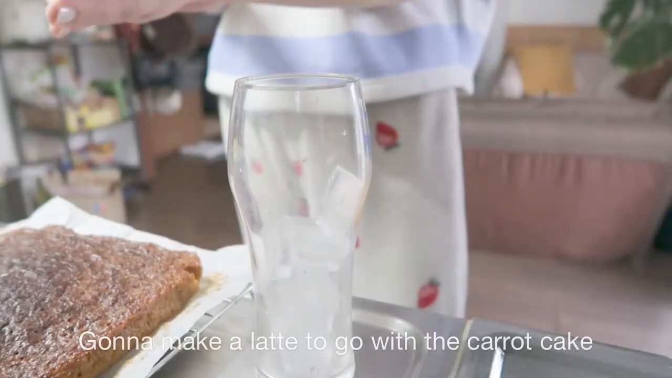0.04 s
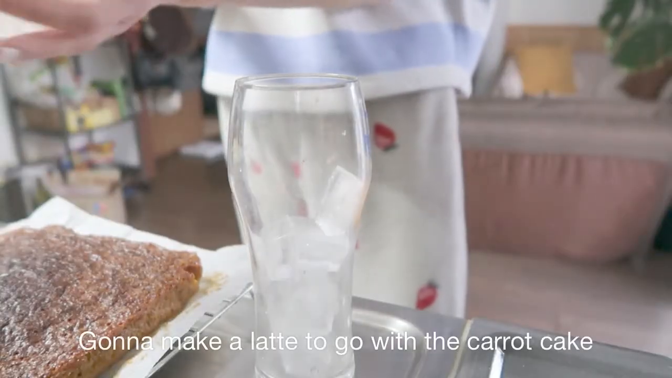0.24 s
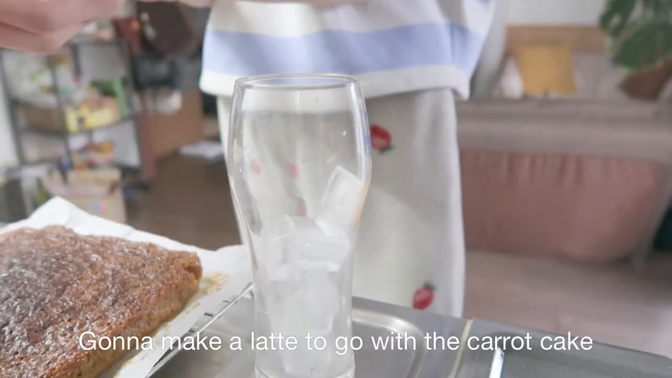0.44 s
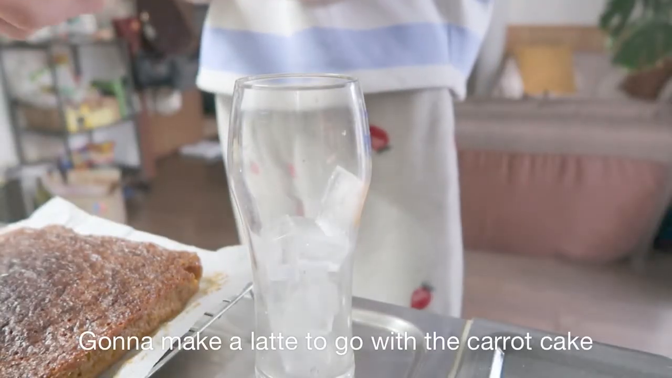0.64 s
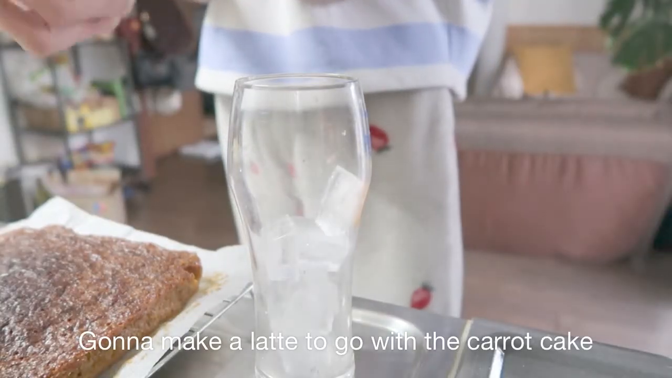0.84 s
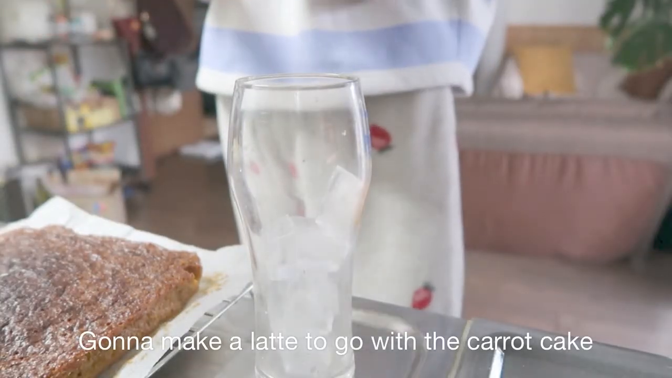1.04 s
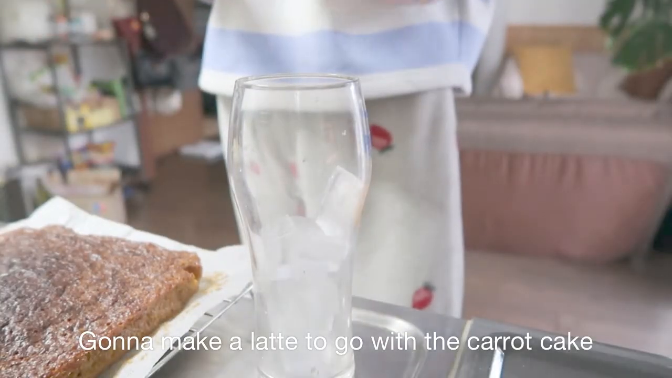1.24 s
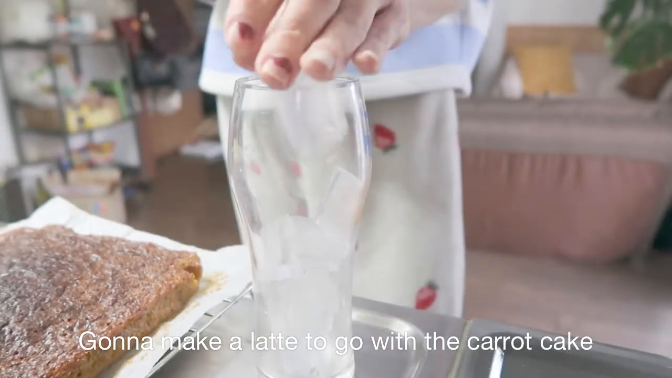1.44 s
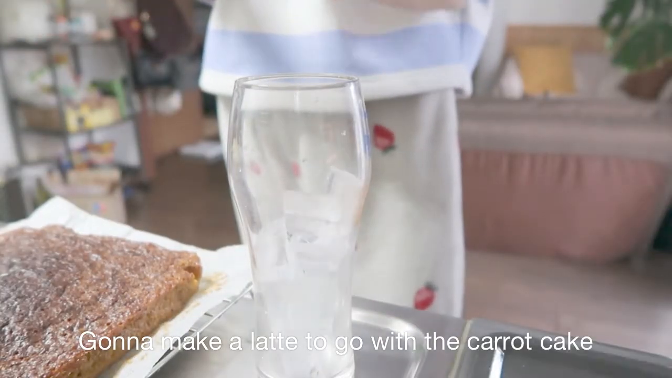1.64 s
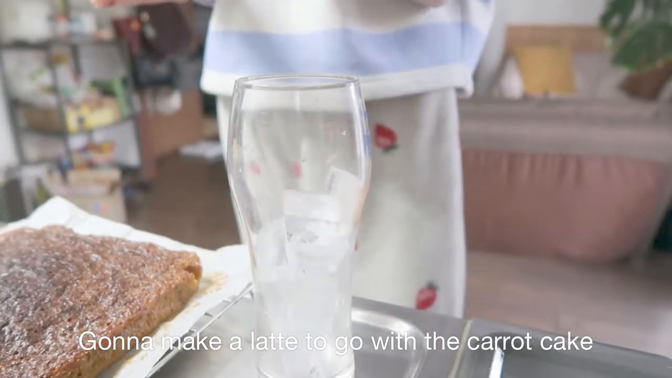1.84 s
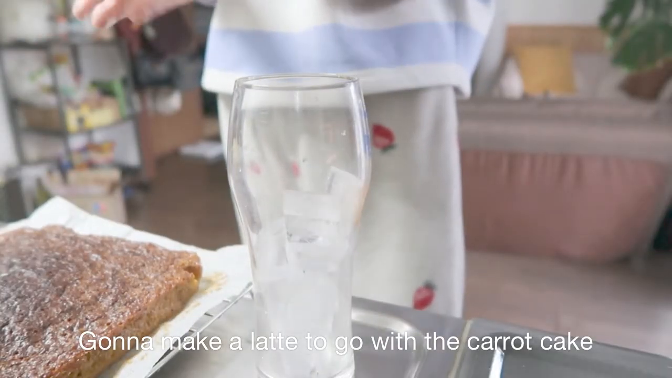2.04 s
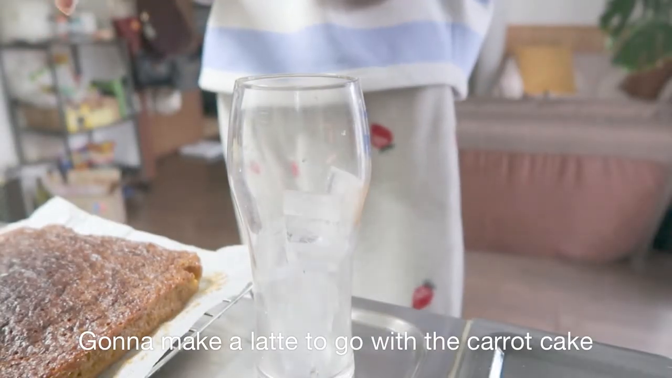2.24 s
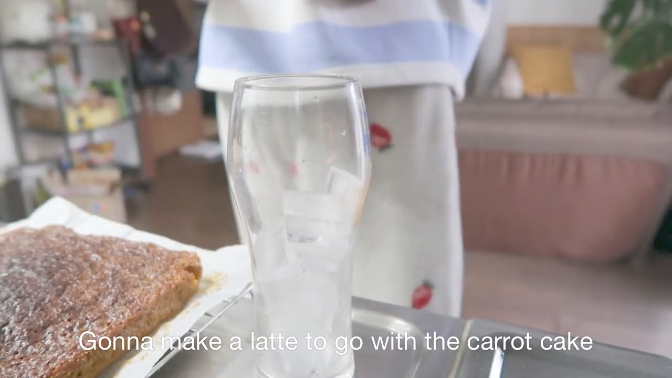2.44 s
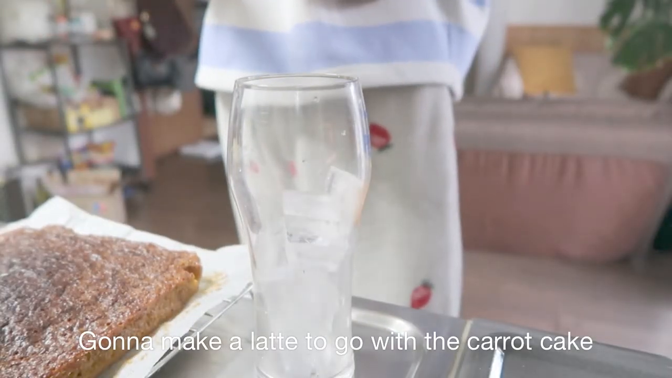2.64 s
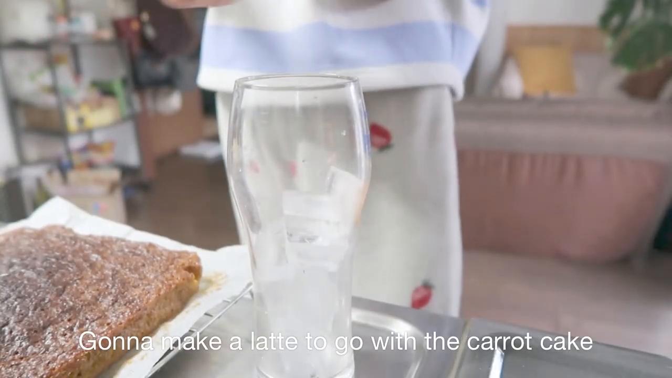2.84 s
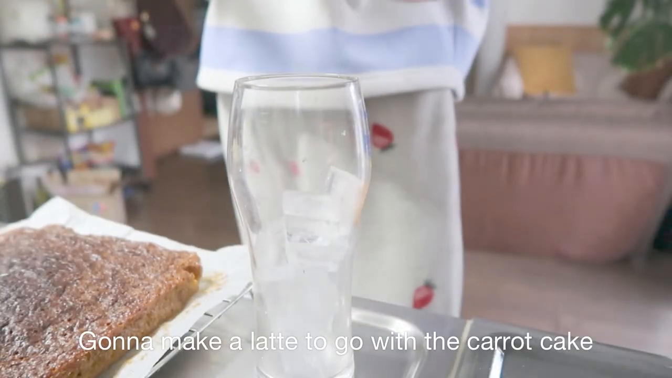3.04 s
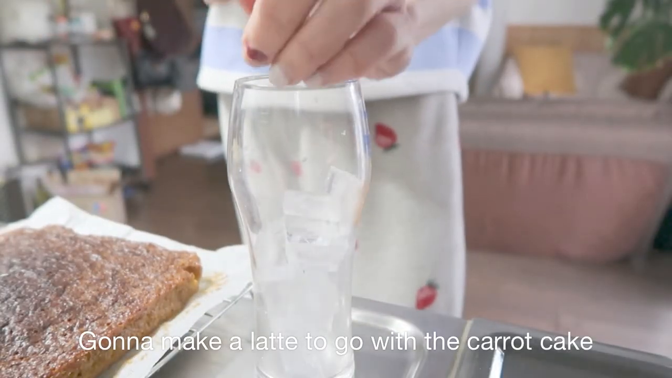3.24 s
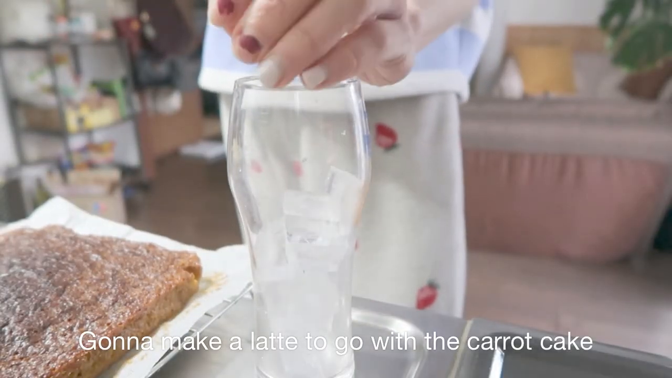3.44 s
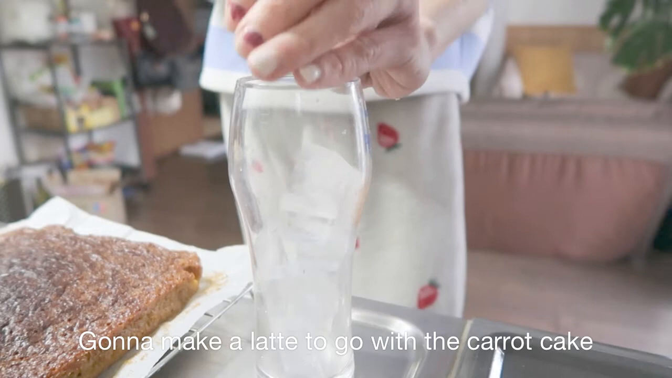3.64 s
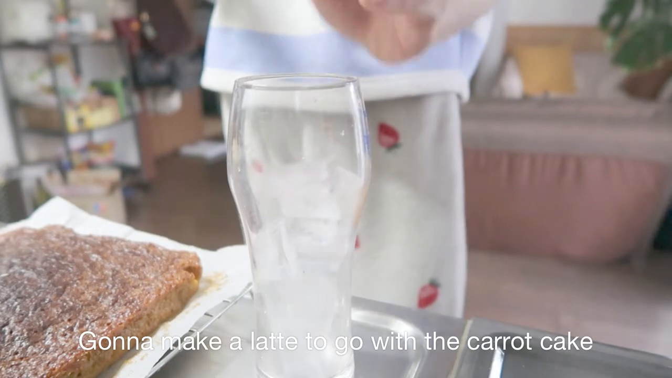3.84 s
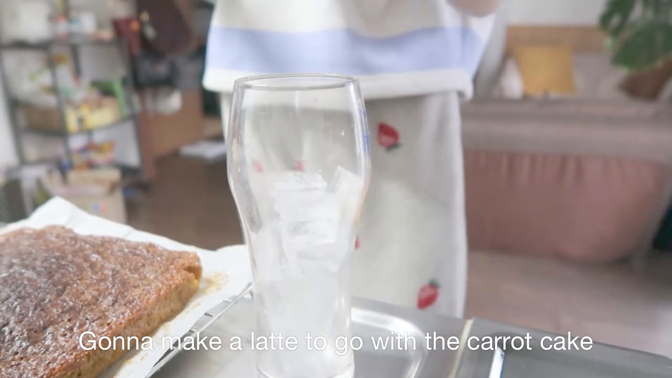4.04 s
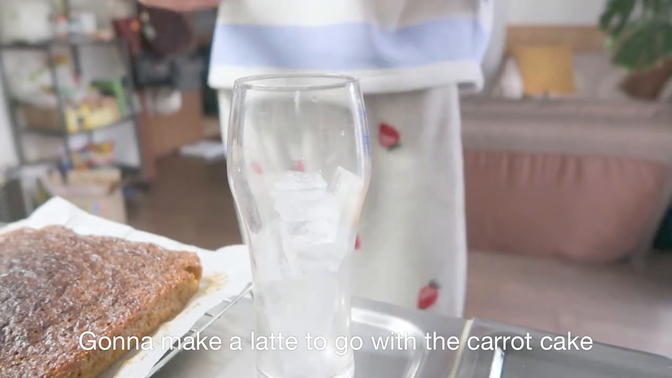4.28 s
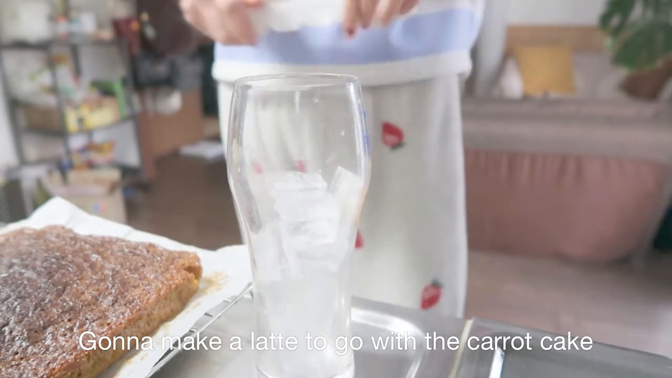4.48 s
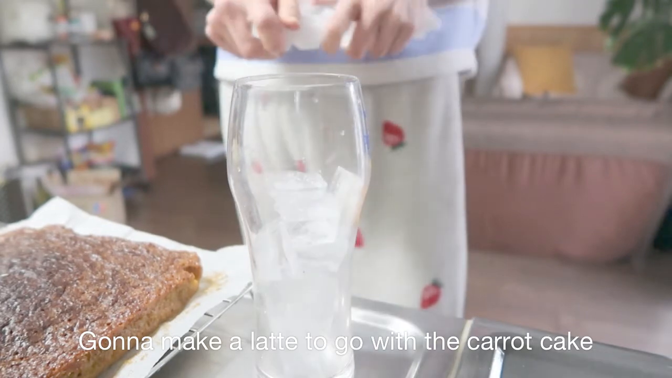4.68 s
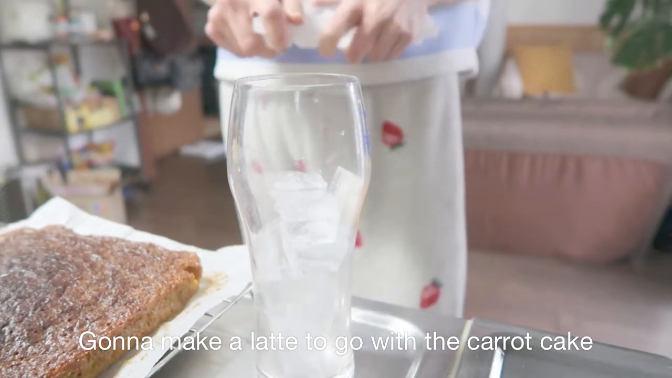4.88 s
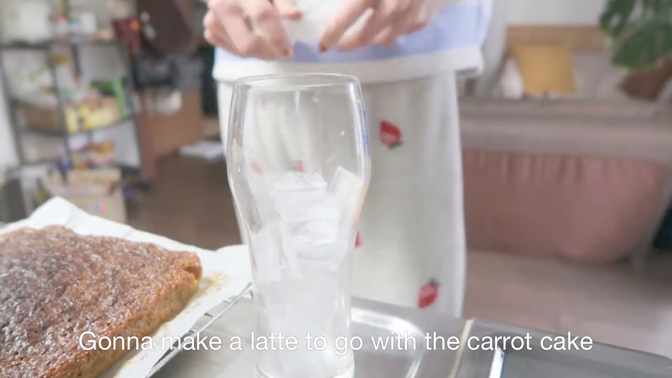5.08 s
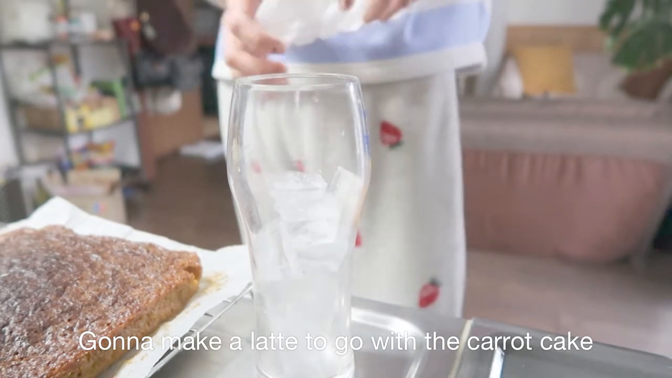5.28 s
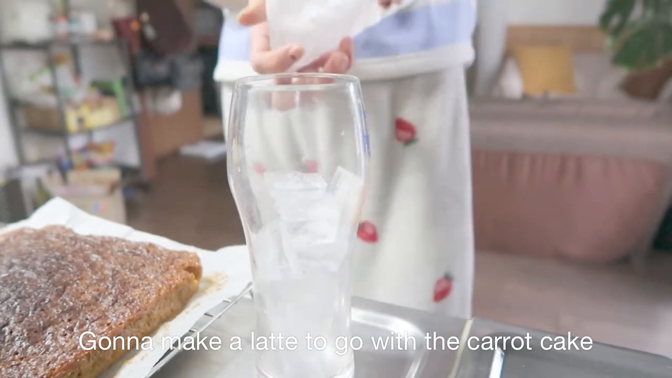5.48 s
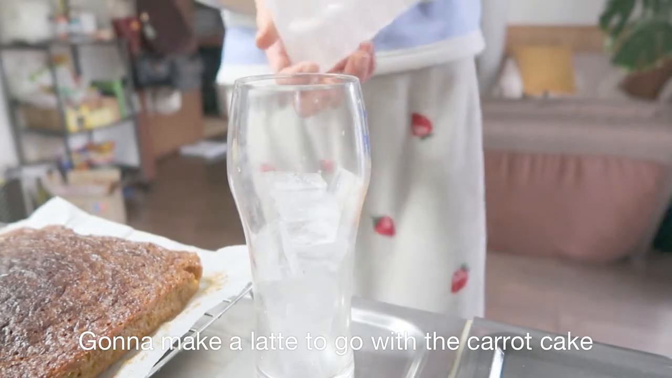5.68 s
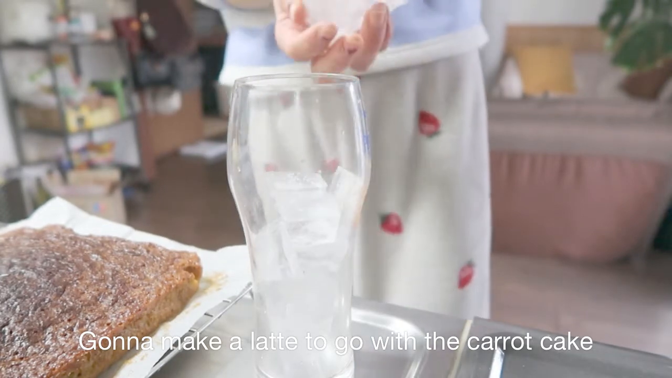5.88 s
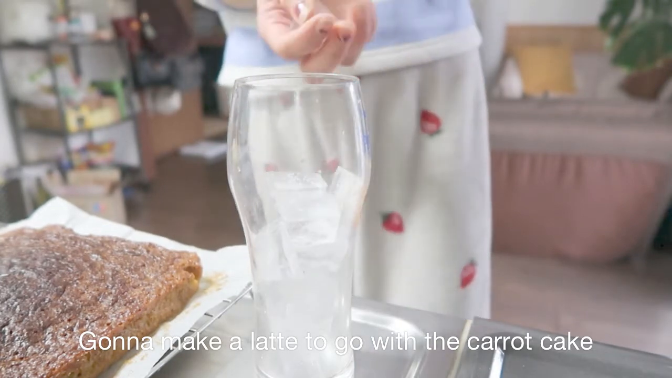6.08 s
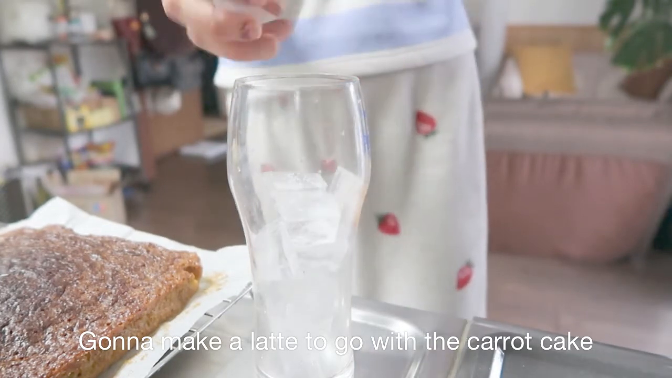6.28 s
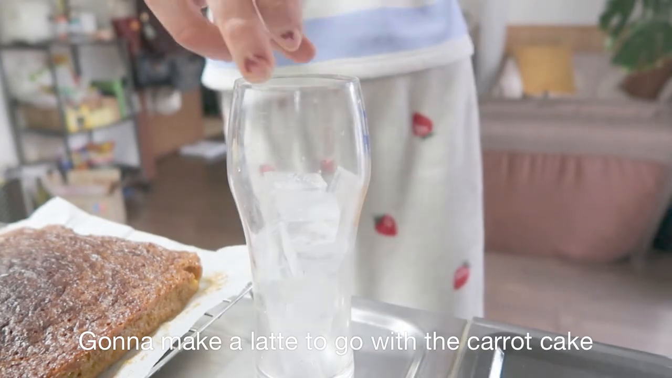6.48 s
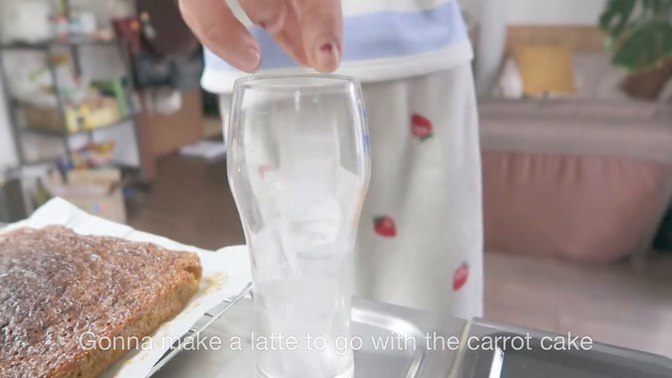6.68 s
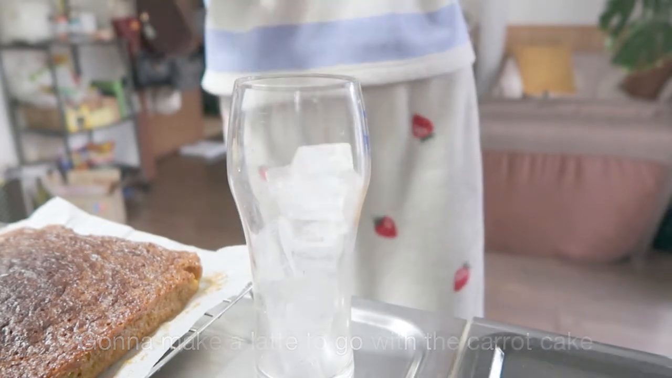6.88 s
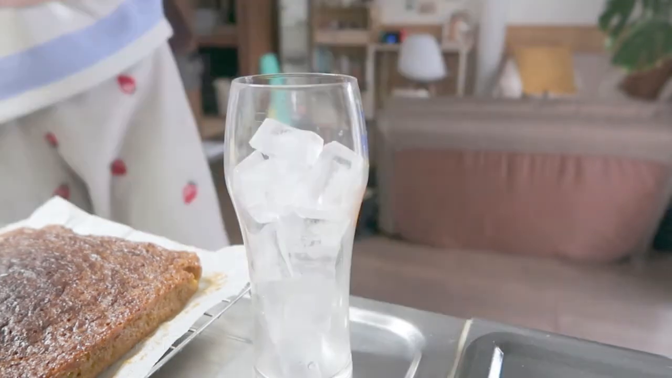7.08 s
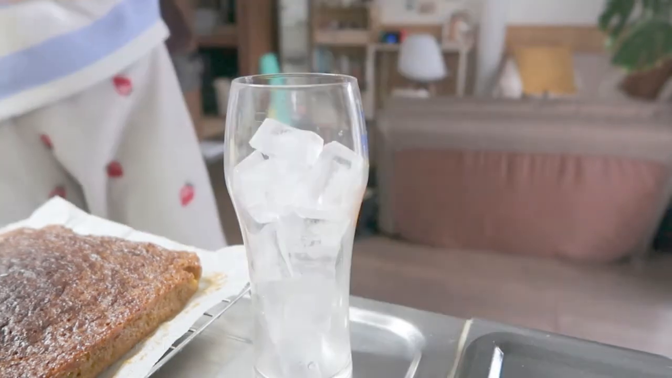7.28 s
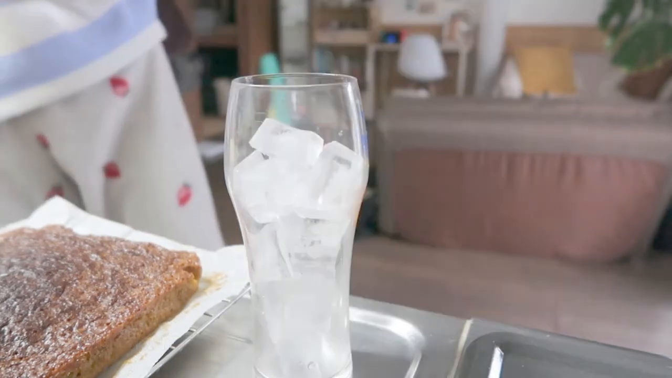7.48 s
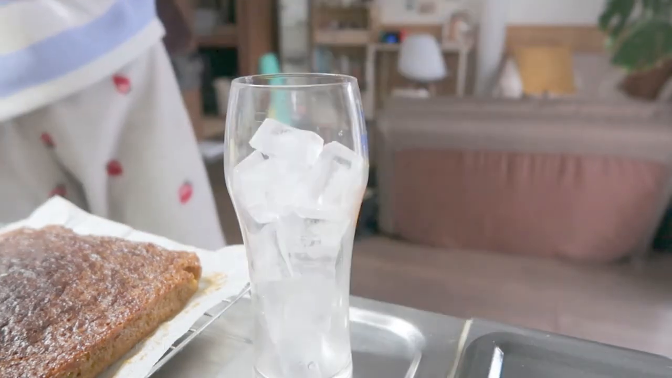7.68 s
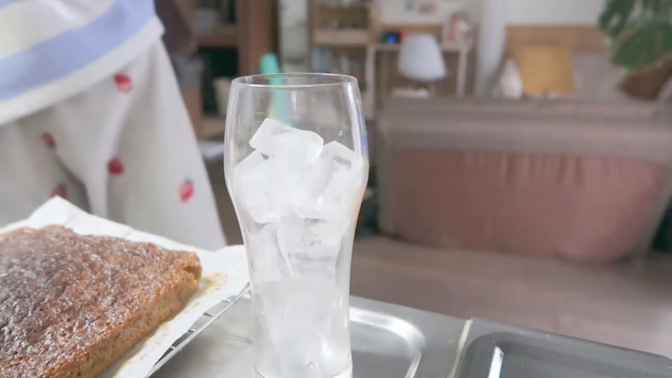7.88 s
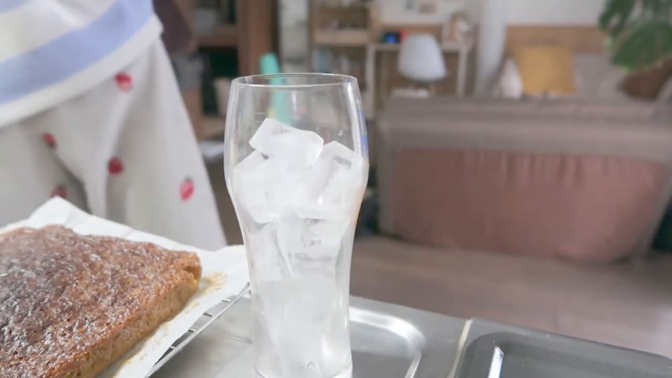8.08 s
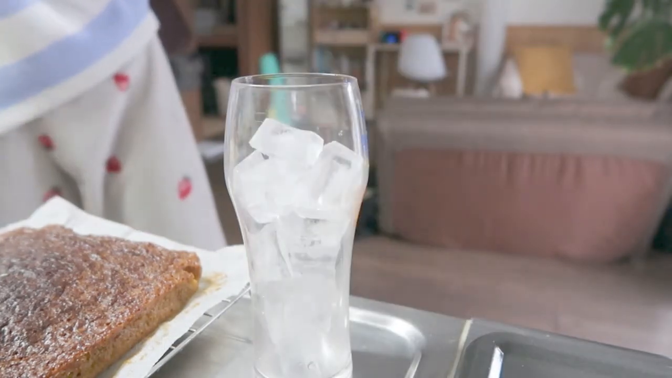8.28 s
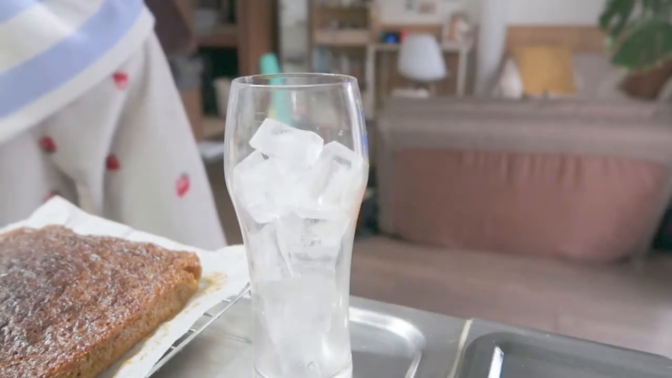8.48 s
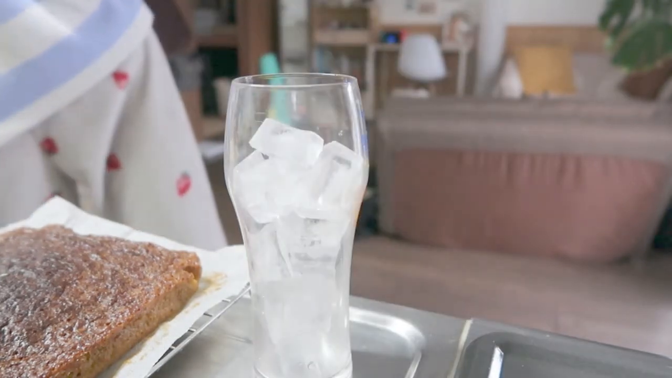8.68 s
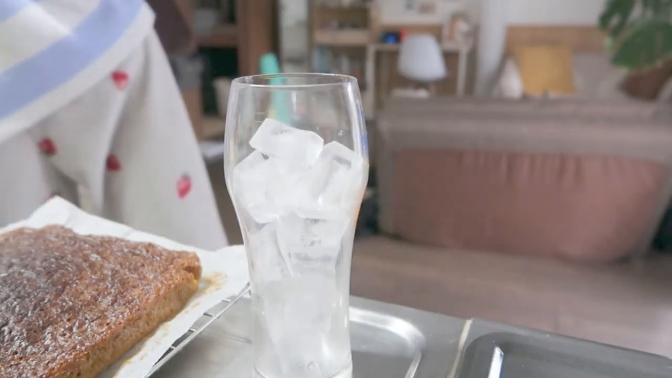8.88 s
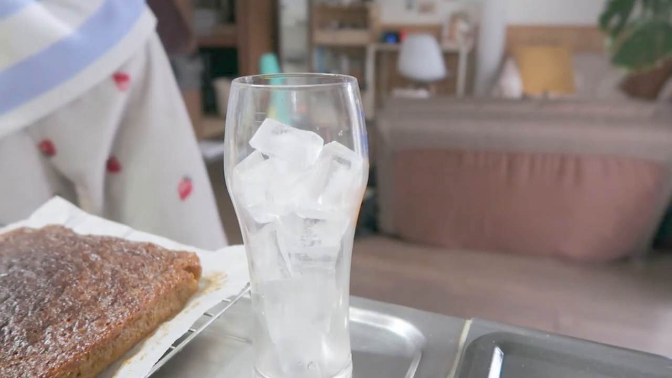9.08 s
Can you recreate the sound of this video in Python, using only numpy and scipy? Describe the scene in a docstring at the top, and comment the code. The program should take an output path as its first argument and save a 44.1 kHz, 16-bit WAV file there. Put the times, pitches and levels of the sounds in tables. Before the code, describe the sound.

Close, dry stereo sound of ice handling: brittle crackles, scraping and tiny squeaks from a plastic tray, interrupted three times by cubes hitting a glass, with glassy ring, icy clatter and a light counter thump. Between them it is nearly silent, with faint thawing ticks. Towards the end a heavy panel bangs and rattles further into the small room, then soft bumps and muffled crockery chatter.

```python
"""First a plastic ice tray cracks, rubs and squeaks as it is worked, over a soft rumble and hiss.
Three times, ice cubes drop into a tall glass on a kitchen counter: noise bursts make the clacks and thumps,
and decaying sines make the glass, the cubes and the counter ring. Cracks are noise bursts too.
Soft bumps sound further off, something heavy is knocked shut nearby, and distant dishes clink.
The room is small and quiet; loud sounds push its background down for a while."""
import sys
import numpy as np
from scipy import signal
from scipy.fft import rfft, irfft, next_fast_len
from scipy.io import wavfile
from scipy.ndimage import uniform_filter1d

SR = 44100
rng = np.random.default_rng(int(sys.argv[2]) if len(sys.argv) > 2 else 0)


def log_audio(samples):
    """Write samples as a 16-bit WAV file to the path given in sys.argv[1]."""
    # one column per channel
    frames = np.atleast_2d(samples).T
    # limit to full scale, then quantise
    limited = np.clip(frames, -1, 1)
    pcm = np.round(limited * 32767).astype(np.int16)
    wavfile.write(sys.argv[1], SR, pcm)


N = 402191
TIME = np.arange(N) / SR  # seconds since the start
AGE = TIME[:SR // 2]  # seconds since a strike

# All levels in the tables are relative; the functions set the final balance.

# background colours: (frequency [Hz], level [dB])
RUMBLE_COLOUR = [(12, -36), (20, -0.5), (97, 2), (161, -4.5), (252, -3), (325, -6), (399, -3), (515, -12.5),
                 (604, -15), (818, -13.5), (900, -15.5), (1170, -36.5), (1980, -120)]
HISS_COLOUR = [(290, -28), (500, -9.5), (1320, -4), (1550, -7), (1980, -8.5), (2460, -8.5), (3650, -12),
               (3980, -13.5), (4400, -12.5), (5470, -16.5), (12900, -30.5), (13800, -50), (16000, -59)]
# the low rumble swells: (time of peak [s], level [dB], rise [s], fall [s])
RUMBLE_SWELLS = [(3.58, -44.5, 0.22, 0.22), (6.6, -46, 0.17, 0.26), (8.62, -52, 0.7, 0.35),
                 (9.1, -51, 0.27, 0.18)]
RUMBLE_DB, HISS_DB = -53.5, -59
SWING_DB = 10.5  # a swell gains this over one rise time and loses it over one fall time
DUCK_ABOVE_DB, DUCK_RATIO, DUCK_RECOVERY_DB_PER_S = -17, 1.31, 11

# the tray cracks as it is bent: (time [s], level [dB], pitch [Hz], treble against the middle [dB])
CRACKS = [(0.0205, -26.5, 3400, -9.5), (0.0477, -20.5, 2400, -1), (0.0562, -15.5, 3450, -9.5),
          (0.0877, -6, 2930, -2), (0.2169, -7, 2770, 10.5), (0.2281, -8.5, 2800, -6),
          (0.311, -18.5, 1900, 0), (0.3776, -13.5, 1730, -2.5), (.4105, -11.5, 2120, -24),
          (0.4282, -17, 1840, -25), (0.461, -26.5, 1965, -20), (0.516, -32, 4260, 11.5),
          (0.619, -23, 3220, -6), (0.6239, -17, 2570, 1), (0.789, -34, 1430, -22), (1.064, -11.5, 3000, 9),
          (1.069, -10, 2600, 6), (2.0769, -25.5, 1400, -13), (2.1276, -29.5, 3150, 1),
          (2.179, -35, 2610, 0), (2.2934, -15.5, 3860, -21), (2.4728, -21.5, 1680, -12),
          (4.215, -28.5, 2830, -9), (4.271, -34, 3970, -2), (4.397, -22, 3130, 1.5),
          (4.465, -14.5, 2680, -29.5), (4.5424, -16, 1290, -29), (4.723, -14, 4780, -14.5),
          (4.747, 2.5, 2650, -9), (4.7505, -6.5, 1420, -21), (4.7525, -16, 710, -15),
          (5.454, -19, 1480, -3), (5.4955, -24, 2730, -1), (5.522, -26, 2800, -12.5),
          (5.559, -29, 2600, -10), (5.732, -14, 3850, -14.5), (5.7599, -17, 2180, -25),
          (5.815, -21, 3840, -20), (5.907, -18.5, 1950, -26.5), (5.973, -2, 2980, -34),
          (7.3564, -25.5, 2470, 1.5)]
# colour of a snap: (frequency [Hz], level [dB])
CRACK_COLOUR = [(150, -65), (600, -8), (1200, -5.5), (2100, 6), (3200, 4), (4500, 0), (7000, -5.5),
                (10000, -12), (13000, -36), (16000, -42)]
AFTERSNAP_S, AFTERSNAP_DB = 0.0046, -8.5  # typical delay of the second snap; its level against the crack
FORESNAP_S, FORESNAP_DB = 0.0027, -22.5  # the plastic starts to give just before it cracks
SNAP_WALL_Q, SNAP_WALL_DB = 5.05, 15  # the cracked wall's broad resonance; its level against the snap
TICKS_PER_S, TICK_OVER_RUB_DB, TICK_SPREAD_DB = 26, 5.5, 3  # small ticks while the tray is worked
TICK_HZ, TICK_TREBLE_DB = 2400, -9  # middle pitch of the small ticks; their treble

# strokes of ice and fingers on the tray:
# (time of peak [s], level [dB], rise [s], fall [s], pitch of the rubbed wall [Hz])
STROKES = [(.17, -37.5, 0.12, 0.15, 2390), (.28, -34.5, 0.093, 0.2, 1614), (.44, -59, 0.06, .09, 1880),
           (.6, -47, 0.046, 0.029, 3160), (.78, -41.5, 0.092, 0.051, 1390), (.91, -38, 0.048, 0.03, 3700),
           (1.079, -37.5, 0.048, 0.067, 4440), (2.01, -48.5, .071, 0.078, 3050),
           (2.169, -43, 0.033, 0.052, 2770), (2.32, -41, 0.071, 0.033, 3130),
           (2.54, -40.5, 0.069, 0.046, 2490), (2.858, -29, 0.061, .012, 3400),
           (4.39, -39, 0.072, 0.077, 2920), (4.57, -38, 0.049, 0.094, 1560),
           (4.664, -33, 0.065, 0.016, 3680), (4.779, -27.5, 0.034, 0.036, 1550),
           (5.05, -50, 0.058, 0.064, 1720), (5.12, -40, 0.026, 0.065, 2900),
           (5.319, -37.5, 0.053, 0.043, 2760), (5.509, -38, 0.041, 0.055, 2820),
           (5.76, -35.5, 0.056, 0.086, 2740), (6.005, -37.5, 0.063, 0.0085, 2930)]
# colour of the rubbing: (frequency [Hz], level [dB])
RUB_COLOUR = [(410, -39), (700, -21), (2160, -1), (2700, 3), (3840, -6.5), (9230, -11), (11700, -39.5),
              (14000, -18), (15400, -40), (16000, -61)]
# a cube squeaks against the tray as it comes free: (time [s], level [dB], pitch [Hz], length [s])
SQUEAKS = [(0.228, -28, 2102, 0.025), (2.858, -23, 2021, 0.0096), (4.354, -38.5, 2070, 0.0094),
           (6.009, -29.5, 2940, 0.007)]
GRAINS_PER_S = 350
WALL_Q, WALL_DB = 5.6, -10.5  # sharpness of the rubbed wall's resonance; its level against the stroke
JERK_DB, JERKS_PER_S = 3.3, 110  # spread and rate of the uneven jerks

MELT_TICKS_PER_S, MELT_DB, MELT_HZ, MELT_T60_S = 14, -53, 4400, 0.0087  # faint ticks of thawing ice

# cubes strike the glass: (time [s], clack [dB], cube pitch [Hz], thump [dB],
# ring near 1.6, 3.9, 6.2 and 7.1 kHz [dB, four columns], ring length [factor], place round the rim [rad])
DROPS = [(1.4861, 6, 3790, -23.5, -11.5, -3, -47, -36, 0.76, 0.16),
         (1.58, -8, 3340, -30.5, -20, -31, -38, -29.5, 0.8, 0.25),
         (1.5883, -12.5, 2900, -18, -22.5, -47, -31, -48, 0.77, 0.095),
         (1.6115, -15, 3550, -23.5, -25, -29.5, -37, -38, 0.82, 0),
         (1.6855, -4, 3030, -23.5, -34, -15.5, -15, -30.5, 0.84, 0),
         (3.3491, -46, 1160, -35.5, -37, -29.5, -53, -36, 0.3, 0.47),
         (3.357, -49, 1700, -34, -46, -52, -58, -42, .5, 0.17),
         (3.463, -50, 1700, -44.5, -49, -61.5, -72, -72, 0.5, 0.057),
         (3.487, -49, 4520, -53.5, -61, -54, -68, -68, 0.98, 0),
         (3.521, -55.5, 3920, -50.5, -62, -52.5, -69, -62, 0.63, 0),
         (3.6118, -22.5, 2630, -29, -27.5, -50, -57, -42, 0.51, 0.1),
         (3.648, -38.5, 1900, -35, -48, -55, -62, -62, .6, 0),
         (3.658, -34, 3700, -34.5, -50, -44, -58, -55, 1.3, 0),
         (3.6855, 0.5, 3520, -18, -23, -10, -30, -40, 0.38, 0),
         (3.6897, -2, 1720, -22, -30, -28, -38, -48, 0.39, 0.38),
         (3.6968, 0.5, 3730, -23, -31, -18, -22, -34, 0.81, 0.24),
         (3.707, -10, 2970, -35, -42, -21.5, -42, -54, 0.38, 0.11),
         (3.722, -18, 2270, -33.5, -44, -40, -33, -52.5, 0.62, 0),
         (3.7354, -16, 3100, -41.5, -48, -36, -33, -56, 0.49, 0),
         (3.747, -25, 4300, -44, -51, -30.5, -41, -49, 1.5, 0),
         (3.759, -33, 3620, -45.5, -48, -37.5, -44, -56, 0.58, 0.11),
         (3.782, -20, 1700, -27, -16.5, -48, -52, -58, 0.14, 0),
         (3.819, -20, 1700, -30.5, -50, -37, -59, -65, 0.7, 0.17),
         (3.886, -46, 3000, -36.5, -46, -42, -60, -66, 0.92, 0.25),
         (3.915, -27, 4400, -33, -50, -38, -52, -64, 0.68, 0.28),
         (3.9265, -19, 3170, -30.5, -35.5, -28.5, -44, -54, 0.61, 0.16),
         (3.941, -13.5, 2380, -29.5, -52, -43, -37, -47, 0.83, 0.23),
         (3.9688, -16, 2280, -35.5, -53, -32, -48, -62, 0.59, 0),
         (3.978, -16.5, 3130, -28, -55, -28.5, -32, -42, 0.51, 0),
         (6.463, -54, 2980, -52.5, -59, -52, -70.5, -63, 0.53, 0.15),
         (6.5597, -60, 3000, -47, -55, -42, -67, -55, 0.31, 0.049),
         (6.7787, -1, 3270, -14.5, -38, -44, -45, -46, 0.59, 0),
         (6.785, -1.5, 2115, -16, -21, -36, -11.5, -44, 0.61, 0.072),
         (6.8, -6, 3740, -46, -14.5, -10.5, -39, -34, 1.07, 1.17),
         (6.817, -27, 3100, -32, -54, -33, -25, -54, 0.58, 0.054),
         (6.854, -29, 3380, -40, -56, -50, -37, -58, 0.62, 0.36),
         (6.865, -25, 4200, -38.5, -48, -47, -51, -60, 1.1, 0)]
# the glass wall: (frequency [Hz], level [dB], 60 dB decay before the ring length factor [s])
GLASS_MODES = [(1620, -1.5, 0.31), (2150, -25, 0.19), (3040, -26, 0.201), (3150, -16, 0.1),
               (3390, -23, 0.2), (3569, -23.5, .19), (3871, -1, 0.29), (4460, -27.5, .1),
               (6260, -1, 0.1094), (6400, -9, 0.18), (6660, -8.5, 0.23), (7120, 2, 0.15), (7220, -5, 0.14),
               (7790, -13.5, 0.091), (8600, -20.5, 0.067), (9430, -12, 0.23), (9050, -17.5, 0.14),
               (10600, -17.5, 0.1), (11600, -15, 0.043), (13280, -15, .13)]
# the glass on the counter: (frequency [Hz], level [dB], 60 dB decay [s])
FOOT_MODES = [(88.7, -15, 0.48), (121, -16.5, 0.18), (192, -16.5, 0.1), (218, -13.5, 0.15),
              (384, -15, 0.15), (462.5, -16, 0.057), (621, -5.5, 0.096), (950, -11.5, 0.036),
              (1153, -6, 0.052)]
# a cube's own short ring: (ratio to its pitch, level against its clack [dB], 60 dB decay [s])
CUBE_MODES = [(.63, -20.5, .025), (1, -10, .028), (1.19, -21, .022)]
# colours of ice on ice, of the counter under it, and of a hard tick: (frequency [Hz], level [dB])
CLACK_COLOUR = [(40, -47.5), (200, -33), (700, -4.5), (1200, -11), (1700, 1), (2500, -4.5), (3300, 0.5),
                (3950, 8), (4600, -8.5), (6300, -11.5), (8000, -21), (12000, -29.5), (16000, -33)]
COUNTER_COLOUR = [(25, -30.5), (50, -10), (90, -7.5), (160, -8), (220, -0.5), (450, -16.5), (620, -6),
                  (850, -11.5), (1200, -8), (2500, -9.5), (6000, -35.5)]
TICK_COLOUR = [(100, -49), (3000, -7.5), (7000, 1), (9500, 3.5), (12000, -5.5), (13500, 0.5), (16000, -21)]
# cubes jostle in the fingers or settle on the pile: (start [s], length [s], clack [dB])
JOSTLES = [(3.531, .07, -46.5), (3.712, .05, -27.5), (3.844, .13, -42)]
# ring of a jostle against its clack: (near 1.6 kHz [dB], 3.9 kHz [dB], 6.2 kHz [dB], 7.1 kHz [dB])
JOSTLE_RING_DB = [-8.5, -20, -24.5, -34]
# pitch range of jostling cubes: (lowest [Hz], highest [Hz])
CUBE_HZ = [1710, 4400]
JOSTLE_GAP_S, JOSTLE_SPREAD_DB, JOSTLE_THUMP_DB = 0.02, 2.5, -8  # the thump is against the clack
EDGE_TICK_DB = -14  # the tick of an edge on the wall against the 3.9 kHz ring
TWIN_SPLIT_HZ = 6.6  # distance between the two pitches of each wall mode
SETTLE_S = 0.21  # a cube comes to lean on the wall and chokes the ring (times the ring length factor)
CHOKED_DB = -19.5  # the thin ring that a leaning cube lets through

# soft, low bumps further off: (time [s], level [dB], pitch [Hz], length [s])
BUMPS = [(4.863, -47.5, 248, 0.029), (7.494, -42, 260, .02), (8.406, -51.5, 287, 0.022),
         (8.445, -46.5, 325, .025), (8.452, -56, 790, 0.019), (8.668, -46, 276, .02),
         (8.79, -51, 281, 0.015), (8.963, -45.5, 300, .03), (9.033, -41.5, 506, 0.029),
         (9.095, -48, 504, 0.032)]
BUMP_Q = 6.3

# bumps and heavy knocks: (time [s], rattle [dB], hollow body [dB], boom [dB])
KNOCKS = [(7.64, -9, -10, -33), (7.647, -14.5, -19, -39), (7.682, -21, -27.5, -31),
          (7.745, -29.5, -34, -33.5), (7.824, -26.5, -30.5, -41), (7.828, -22, -22, -33.5),
          (7.9117, -7.5, -18.5, -23), (7.9144, -14.5, -19, -31), (7.9369, -10, -12.5, -15.5),
          (7.9489, -10, -25, -20.5), (7.966, -16.5, -36, -29), (7.992, -22, -30, -25),
          (8.056, -19.5, -25.5, -34), (8.1183, -29, -28, -39), (8.14, -34, -33, -38.5)]
# colours of these three parts: (frequency [Hz], level [dB])
RATTLE_COLOUR = [(40, -54), (300, 3), (700, -4.5), (1020, 6.5), (1400, -0.5), (2100, 8), (2600, -1),
                 (3800, -1), (4700, -8), (6500, -9.5), (10000, -19.5), (12500, -37), (16000, -49)]
HOLLOW_COLOUR = [(40, -65), (100, -26), (200, -10), (280, 4), (360, -5.5), (440, 4), (580, 1), (720, -5),
                 (850, -27), (1500, -6.5), (4000, -39.5)]
BOOM_COLOUR = [(25, -46), (50, -11), (70, -9), (128, -9.5), (165, -4), (215, 1.5), (270, -11), (360, -10.5),
               (700, -22), (2000, -56)]
# what the knocked panel rings with: (frequency [Hz], level [dB], 60 dB decay [s])
PANEL_MODES = [(93.4, -14.5, 0.7), (127.5, -13, 0.88), (150.5, -11, 0.43), (192.5, -11.5, 0.37),
               (219, -6, 0.18), (263, 3, 0.094), (389, -12, 0.24), (430.5, -9, 0.12), (571, -10.5, 0.11),
               (712, -13, 0.17), (1020, -13, 0.16), (780, -22, 0.11), (1797, -12, 0.2), (2159, -16, 0.086)]
# first bounce against its knock: (rattle [dB], hollow body [dB], boom [dB])
BOUNCE_DB = [-13.5, -17.5, -11.5]
BOUNCE_GAP_S, BOUNCE_SLOWING, BOUNCE_LOSS_DB = .024, 1.3, 5.5  # bounces come ever more rarely and weakly
CHATTER_S, CHATTER_DB, CHATTER_LOSS_DB_PER_S = .11, -6.5, 170  # loose parts chatter on after a jolt
# pitch range of the loose parts: (lowest [Hz], highest [Hz])
LOOSE_HZ = [450, 4000]
LOOSE_CYCLES = 39  # swings until a loose part has lost 60 dB
LATCH_S, LATCH_DB = 7.9495, -19.5  # a latch snaps home as the panel settles

# distant dishes: (time [s], clatter [dB], ring near 1, 1.4 and 2.6 kHz [dB, three columns])
DISHES = [(8.541, -33, -34, -36.5, -53), (8.55, -40, -41, -41, -50), (8.889, -36.5, -31.5, -44.5, -42),
          (9.022, -24.5, -53, -30, -53), (9.036, -27.5, -55, -20, -36.5), (9.048, -35, -47, -24.5, -39),
          (9.067, -35, -52, -40, -49)]
# the crockery: (frequency [Hz], level [dB], 60 dB decay [s])
DISH_MODES = [(982, -1.5, 0.093), (1079, 3.5, 0.085), (1388, 2, 0.21), (1422, -3, .14), (1540, 7, 0.069),
              (1617, -11, 0.28), (1760, -3.5, 0.12), (2230, -1.5, 0.18), (2620, -5, 0.32), (3160, -15, .13)]
# colour of the clatter: (frequency [Hz], level [dB])
CLATTER_COLOUR = [(200, 6), (700, -4.5), (1000, -10), (1500, 2.5), (2300, 0.5), (3400, -8.5), (4200, -19),
                  (5000, -22), (10000, -38), (16000, -70.5)]

# colour of the room's echo: (frequency [Hz], level [dB])
WALLS_COLOUR = [(80, -5), (300, 5.5), (2000, -1.5), (6000, 1), (10000, -0.5), (16000, -18)]
# phase between the two microphone ports: (frequency [Hz], phase [rad])
PORTS = [(0, 0), (1200, .15), (2800, .2), (3900, .55), (4800, 1.3), (6300, 1.6), (8000, 1.9), (11000, 2.0),
         (16000, 2.0)]
# the same for a source straight ahead: (frequency [Hz], phase [rad])
PORTS_AHEAD = [(0, 0), (4700, .1), (6200, .4), (7600, 2.2), (16000, 2.1)]
# the tray moves from the left to above the glass: (time [s], share to the left [0-1])
TRAY_ASIDE = [(3, 1), (4, 0)]
CUTOFF_HZ = 15700


def from_db(db):
    """Decibels to gain."""
    return 10 ** (np.asarray(db) / 20)


def rms_one(x):
    """Scale to unit power."""
    return x / np.sqrt(np.mean(x ** 2))


def add(track, s, sound):
    """Mix a sound into a track at a time in seconds."""
    at = max(0, round(s * SR))
    track[at:at + len(sound)] += sound[:N - at]


def fade(t60):
    """Free decay from height 1 that loses 60 dB in t60 seconds."""
    return np.exp(-np.log(1000) * AGE / t60)


def colour(x, spectrum, size=4096):
    """Filter without pre-echo (minimum phase) to a given colour, keeping the power of white noise."""
    hz, db = np.transpose(spectrum)
    bins_hz = np.fft.rfftfreq(size, 1 / SR)
    gain = rms_one(from_db(np.interp(np.log(bins_hz + 1), np.log(hz), db)))
    cepstrum = irfft(np.log(gain))
    # folding the cepstrum puts all of the response after time zero
    cepstrum[1:size // 2] *= 2
    cepstrum[size // 2 + 1:] = 0
    response = irfft(np.exp(rfft(cepstrum)))
    return signal.oaconvolve(x, response)[:N]


def resonate(x, hz, q):
    """One resonance: passes its own pitch and weakens the rest, more sharply for a higher q."""
    return signal.lfilter(*signal.iirpeak(hz, q, fs=SR), x)


def ring(modes):
    """Struck modes (Hz, dB, t60) as decaying sines; neighbouring modes swing in opposite directions."""
    out = np.zeros(len(AGE))
    for k, (hz, db, t60) in enumerate(modes):
        age = AGE[:int(t60 * SR * 4 / 3) + 1]  # stop at -80 dB
        decay = np.exp(-np.log(1000) * age / t60)
        out[:len(age)] += (-1) ** k * from_db(db) * decay * np.sin(2 * np.pi * hz * age)
    return out


def blow(crack_t60, tail_db, tail_t60):
    """A sharp contact, then the weaker shudder of countless overlapping modes, both as fading noise."""
    return rng.standard_normal(len(AGE)) * (fade(crack_t60) + from_db(tail_db) * fade(tail_t60))


def widen(mid, side, split_hz):
    """Two unrelated sounds become a stereo pair that differs mainly above the split."""
    side = signal.sosfilt(signal.butter(2, split_hz, "high", fs=SR, output="sos"), side)
    return np.array([mid + side, mid - side])


def swells(rows):
    """Gain over time of gestures that each rise to a peak and fall away."""
    gain = np.zeros(N)
    for s, db, rise, fall, *_ in rows:
        distance = np.maximum((s - TIME) / rise, (TIME - s) / fall)
        gain += from_db(db - SWING_DB * distance)
    return gain


def room_tone():
    """A low rumble of noise that swells now and then, under an even hiss."""
    rumble = widen(*(colour(rng.standard_normal(N), RUMBLE_COLOUR) for _ in range(2)), split_hz=290)
    hiss = widen(*(colour(rng.standard_normal(N), HISS_COLOUR) for _ in range(2)), split_hz=200)
    rumble_gain = np.hypot(from_db(RUMBLE_DB), swells(RUMBLE_SWELLS))
    return rumble_gain * rumble + from_db(HISS_DB - 0.5) * hiss


def small_ticks(pressure, pitch_spread):
    """Random ticks that grow with the pressure on the tray; same columns as the cracks."""
    chance = TICKS_PER_S / SR * (pressure > from_db(HISS_DB))
    rows = []
    for i in np.flatnonzero(rng.random(N) < chance):
        size, pitch = rng.standard_normal(2)
        db = 20 * np.log10(pressure[i]) + TICK_OVER_RUB_DB + TICK_SPREAD_DB * size
        rows.append((i / SR, db, TICK_HZ * np.exp(pitch_spread * pitch), TICK_TREBLE_DB))
    return rows


def tray_cracks(pressure):
    """Each crack is a quick run of dry snaps, coloured by the wall of the tray that gives way."""
    snaps, edges, walls = np.zeros((3, N))
    rows = CRACKS + small_ticks(pressure, pitch_spread=0.35)
    for s, db, hz, treble_db in CRACKS:
        rows.append((s - FORESNAP_S, db + FORESNAP_DB, hz, treble_db))
        after_s = s + AFTERSNAP_S * rng.uniform(0.55, 1.3)
        rows.append((after_s, db + AFTERSNAP_DB, hz * rng.uniform(.75, 0.8), treble_db))
    for s, db, hz, treble_db in rows:
        snap = from_db(db - 13.0) * blow(crack_t60=0.025, tail_db=-31.5, tail_t60=0.032)
        add(snaps, s, snap)
        add(edges, s, (from_db(treble_db + 3.0) - 1) * snap)
        wall_hz = min(hz, SR / 4)
        wall = resonate(resonate(snap, wall_hz, SNAP_WALL_Q), wall_hz, SNAP_WALL_Q)
        add(walls, s, from_db(SNAP_WALL_DB) * wall)
    # the treble part brightens or dulls each snap
    edges = signal.lfilter(*signal.butter(1, 3500, "high", fs=SR), edges)
    return colour(snaps + edges, CRACK_COLOUR) + walls


def rubbed_walls(slips):
    """Each stroke drags on another wall of the tray, which sings at its own pitch."""
    return sum(swells([stroke]) * rms_one(resonate(slips, stroke[-1], WALL_Q)) for stroke in STROKES)


def jerks():
    """Ice sticks and slips, so the rubbing comes in short uneven jerks; a gain of unit power."""
    steps = rng.standard_normal(int(JERKS_PER_S * N / SR) + 2)
    return rms_one(from_db(JERK_DB * np.interp(TIME * JERKS_PER_S, np.arange(len(steps)), steps)))


def coarse_grains(grains_per_s):
    """Coarser grains tick in twelve narrow resonances, many of them small and few large."""
    grains = np.zeros(N)
    for hz in np.geomspace(1400, 4600, 12):
        clicks = np.zeros(N)
        when, size = rng.random((int(grains_per_s * N / SR / 12), 2)).T
        clicks[(when * N).astype(int)] = size ** 3
        grains += resonate(clicks + 1e-18, hz, 14)  # the tiny offset keeps the filter fast
    return signal.sosfilt(signal.butter(2, 5500, fs=SR, output="sos"), grains)


def squeaks():
    """Now and then the ice locks into a squeak: a short sine with a wandering phase."""
    out = np.zeros(N)
    for s, db, hz, length in SQUEAKS:
        phase = 2 * np.pi * hz * TIME + 0.0923 * np.cumsum(rng.standard_normal(N))
        near = np.abs(TIME - s) < 4 * length
        swell = np.exp(-((TIME[near] - s) / length) ** 2)
        out[near] += from_db(db) * swell * np.sin(phase[near])
    return out


def tray_rubbing(pressure, slips_per_s, spread_db, grains_per_s, grain_db):
    """Frosty ice slips on plastic in tiny uneven steps, with ticking grains, singing walls and squeaks."""
    sizes = from_db(spread_db * np.minimum(rng.exponential(1, N), 4))
    slips = rms_one(sizes * rng.standard_normal(N) * (rng.random(N) < slips_per_s / SR))
    grains = rms_one(coarse_grains(grains_per_s))
    rubbing = pressure * (from_db(-13.5) * colour(slips, RUB_COLOUR) + from_db(grain_db) * grains)
    rubbing += from_db(WALL_DB) * rubbed_walls(slips)
    return jerks() * rubbing + squeaks()


def thawing():
    """Thawing ice ticks faintly at random: very short sines."""
    out = np.zeros(N)
    for when, pitch, size in rng.random((int(MELT_TICKS_PER_S * N / SR), 3)):
        tick = (MELT_HZ * (0.9 + 0.2 * pitch), MELT_DB + 10 * (size - .5), MELT_T60_S)
        add(out, when * TIME[-1], ring([tick]))
    return out


def jostling(ring_length):
    """Light, unevenly spaced contacts while cubes shift; same columns as the drops."""
    rows = []
    for start, length, db in JOSTLES:
        for s in np.arange(start, start + length, JOSTLE_GAP_S):
            clack_db = db + rng.normal(0, JOSTLE_SPREAD_DB)
            ring_db = clack_db + np.array(JOSTLE_RING_DB) + rng.normal(0, JOSTLE_SPREAD_DB, 4)
            rows.append((s + JOSTLE_GAP_S * rng.uniform(0, 0.32), clack_db, rng.uniform(*CUBE_HZ),
                         clack_db + JOSTLE_THUMP_DB, *ring_db, ring_length, rng.uniform(0, np.pi)))
    return rows


def wall_ring(ring_db, length, place):
    """Not quite round, the glass has twin modes that beat by place of contact; a settling cube chokes them."""
    anchors_hz = [1621, 3871, 6300, 7100]
    lower, upper = [], []
    for hz, db, t60 in GLASS_MODES:
        lobes = round(2 * np.sqrt(hz / anchors_hz[0]))
        share = np.clip(np.sin(lobes * place) ** 2, .001, .999)  # how much the upper twin gets
        db = db + np.interp(hz, anchors_hz, ring_db)
        lower.append((hz, db + 20 * np.log10(1 - share), t60 * length))
        upper.append((hz + TWIN_SPLIT_HZ, db + 20 * np.log10(share), t60 * length))
    choke = np.exp(-(AGE / (SETTLE_S * length)) ** 4)
    choke += from_db(CHOKED_DB) * (1 - choke)
    return (ring(lower) + ring(upper)) * choke


def ice_in_glass():
    """Each cube clacks with its own note, sets off the glass wall and thumps the counter through the foot."""
    clacks, ticks, thumps, rings = np.zeros((4, N))
    for s, clack_db, cube_hz, thump_db, *ring_db, length, place in DROPS + jostling(ring_length=0.94):
        clack = from_db(clack_db - 11.0) * blow(crack_t60=0.02, tail_db=-28.5, tail_t60=0.13)
        pile_shudder = from_db(thump_db) * blow(crack_t60=0.042, tail_db=-18.5, tail_t60=0.27)
        edge_gain = from_db(ring_db[1] + EDGE_TICK_DB)
        add(clacks, s, clack + pile_shudder)
        add(ticks, s, edge_gain * blow(crack_t60=0.022, tail_db=-32, tail_t60=.05))
        add(thumps, s, from_db(thump_db - 6.5) * blow(crack_t60=0.0079, tail_db=-6.0, tail_t60=0.26))
        foot = [(hz * rng.normal(1, .015), db + thump_db + rng.normal(0, 2.3), t60)
                for hz, db, t60 in FOOT_MODES]
        cube = [(cube_hz * ratio, clack_db + db, t60) for ratio, db, t60 in CUBE_MODES]
        add(rings, s, wall_ring(ring_db, length, place) + ring(foot) + ring(cube))
    noises = colour(clacks, CLACK_COLOUR) + colour(ticks, TICK_COLOUR) + colour(thumps, COUNTER_COLOUR)
    return noises + rings


def bumps():
    """Padded contacts with no click: a short swell in one broad, low resonance."""
    out, shudder = np.zeros(N), rng.standard_normal(N)
    for s, db, hz, length in BUMPS:
        near = np.abs(TIME - s) < 3 * length
        swell = np.exp(-((TIME[near] - s) / length) ** 2)
        out[near] += from_db(db) * swell * rms_one(resonate(shudder[near], hz, BUMP_Q))
    return out


def bounces(count, spread_db):
    """The dying rattle after each knock; same columns as the knocks."""
    rows = []
    for s, *db in KNOCKS:
        for k in range(count):
            later = BOUNCE_GAP_S * (k + rng.uniform(0.93, 1.1)) ** BOUNCE_SLOWING
            levels = np.array(db) + BOUNCE_DB - BOUNCE_LOSS_DB * k + rng.normal(0, spread_db, 3)
            rows.append((s + later, *levels))
    return rows


def loose_parts(rattle_db, count):
    """A jolt sets loose parts chattering: short clacks at uneven times, each with its own pitch and strength."""
    out = np.zeros(N)
    for when, pitch, size in rng.random((count, 3)):
        s = CHATTER_S * when
        hz = LOOSE_HZ[0] * (LOOSE_HZ[1] / LOOSE_HZ[0]) ** pitch
        db = rattle_db + CHATTER_DB - CHATTER_LOSS_DB_PER_S * s
        add(out, s, size * ring([(hz, db, LOOSE_CYCLES / hz)]))
    return out[:len(AGE)]


def panel_ring(hollow_db, boom_db):
    """The panel's modes: low ones follow the boom, high ones the hollow body, each a little uneven."""
    modes = []
    for hz, db, t60 in PANEL_MODES:
        part_db = np.interp(hz, [270, 430], [boom_db, hollow_db])
        modes.append((hz * rng.normal(1, 0.0208), db + rng.normal(0, 2.5) + part_db, t60))
    return ring(modes)


def knocks():
    """A heavy panel lands and bounces: loose parts rattle, its hollow body and its bass ring longer."""
    rattle, hollow, boom, latch, rings = np.zeros((5, N))
    for s, rattle_db, hollow_db, boom_db in KNOCKS + bounces(count=3, spread_db=3.0):
        add(rattle, s, from_db(rattle_db - 4.0) * blow(crack_t60=0.018, tail_db=-13, tail_t60=0.34))
        add(hollow, s, from_db(hollow_db - 2.0) * blow(crack_t60=0.062, tail_db=-22.0, tail_t60=0.27))
        add(boom, s, from_db(boom_db - 4.0) * blow(crack_t60=0.12, tail_db=-4.5, tail_t60=0.34))
        add(rings, s, loose_parts(rattle_db, count=10) + panel_ring(hollow_db, boom_db))
    add(latch, LATCH_S, from_db(LATCH_DB) * blow(crack_t60=0.014, tail_db=-33, tail_t60=.05))
    body = colour(hollow, HOLLOW_COLOUR) + colour(boom, BOOM_COLOUR)
    return colour(latch, TICK_COLOUR) + colour(rattle, RATTLE_COLOUR) + body + rings


def dishes():
    """Crockery chatters, each touch favouring other modes; distance softens the attack."""
    clatter, rings = np.zeros((2, N))
    soft_attack = 1 - fade(0.03)
    for s, clatter_db, *ring_db in DISHES:
        touch = from_db(clatter_db + 0.5) * blow(crack_t60=0.061, tail_db=-13.0, tail_t60=0.5)
        modes = [(hz, db + np.interp(hz, [1000, 1400, 2600], ring_db), t60) for hz, db, t60 in DISH_MODES]
        add(clatter, s, soft_attack * touch)
        add(rings, s, soft_attack * ring(modes))
    return colour(clatter, CLATTER_COLOUR) + rings


def room(x, wet_db, t60, side_db):
    """Direct sound plus a diffuse tail that builds up within milliseconds; its bass is alike on both sides."""
    mid, side = (colour(rng.standard_normal(len(AGE)), WALLS_COLOUR)[:len(AGE)] for _ in range(2))
    tails = widen(mid, from_db(side_db) * side, split_hz=410) * fade(t60) * (1 - fade(0.003353))
    tails = rms_one(tails) / np.sqrt(len(AGE))
    return x + from_db(wet_db) * signal.oaconvolve(x[None], tails, axes=1)[:, :N]


def ports(x, left_db, phases):
    """Treble reaches the left port before the right one by the given phases; left_db is the level gap."""
    size = next_fast_len(N + len(AGE))
    phase = np.interp(np.fft.rfftfreq(size, 1 / SR), *np.transpose(phases))
    sides = np.array([[.5], [-.5]])  # each port takes half of the difference
    shifted = irfft(rfft(x, size) * np.exp(1j * sides * phase), size)[:, :N]
    return shifted * from_db(sides * left_db)


def ducking(x):
    """Gain of a suppressor that lowers the background at loud sounds and recovers slowly."""
    power = np.abs(uniform_filter1d(np.mean(x ** 2, axis=0), size=1024))
    level_db = 10 * np.log10(power + 1e-12)
    push_db = DUCK_RATIO * np.maximum(level_db - DUCK_ABOVE_DB, 0)
    recovery = DUCK_RECOVERY_DB_PER_S * TIME
    # the strongest push so far counts, less what has been recovered since
    return from_db(recovery - np.maximum.accumulate(push_db + recovery))


def scene():
    """The glass stands close to the microphone; everything else is further into the room."""
    pressure = swells(STROKES)
    rubbing = tray_rubbing(pressure, slips_per_s=2200, spread_db=0.0,
                           grains_per_s=GRAINS_PER_S, grain_db=-10.0)
    tray = room(tray_cracks(pressure) + rubbing, wet_db=-12.0, t60=0.2466, side_db=-12.5)
    glass = room(thawing() + ice_in_glass(), wet_db=-18.0, t60=0.28, side_db=-16.5)
    far = room(bumps() + knocks() + dishes(), wet_db=-13.5, t60=0.29, side_db=-14.0)
    aside = np.interp(TIME, *np.transpose(TRAY_ASIDE))
    sounds = ports(aside * tray, left_db=1.4, phases=PORTS)
    sounds += ports((1 - aside) * tray, left_db=0, phases=PORTS_AHEAD)
    sounds += ports(glass, left_db=0.04, phases=PORTS)
    sounds += ports(far, left_db=1.0, phases=PORTS)
    return sounds + ducking(sounds) * room_tone()


def record(dry):
    """The deepest bass is rolled off, the hardest hits overload, the top is cut."""
    lean = signal.sosfilt(signal.butter(2, 32, "high", fs=SR, output="sos"), dry)
    overloaded = np.clip(lean, -1, 1)
    return signal.sosfilt(signal.ellip(10, .1, 80, CUTOFF_HZ, fs=SR, output="sos"), overloaded)


dry = scene()
out = record(dry)
log_audio(out)
```